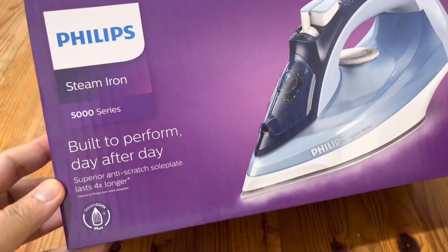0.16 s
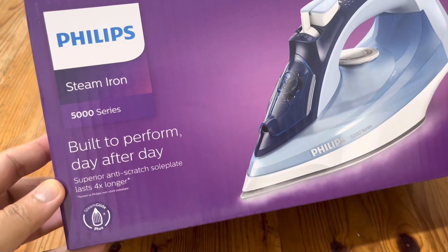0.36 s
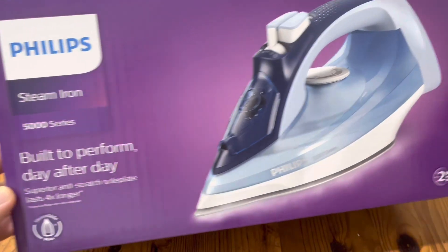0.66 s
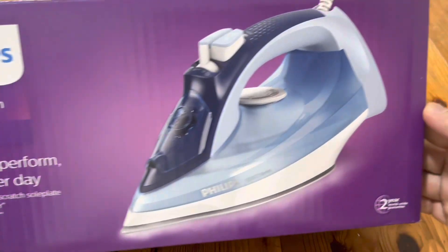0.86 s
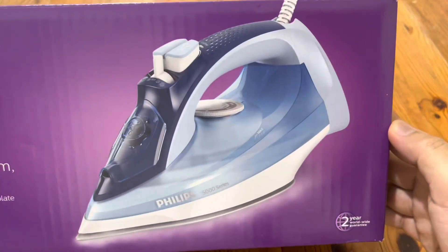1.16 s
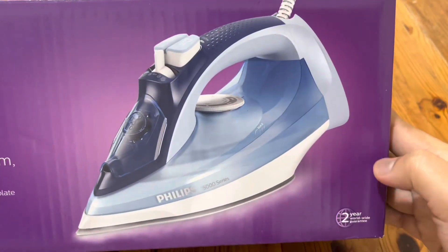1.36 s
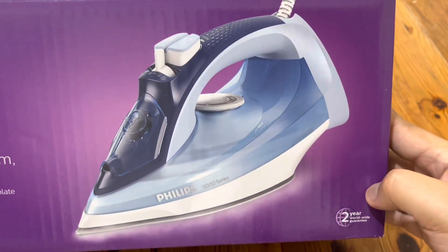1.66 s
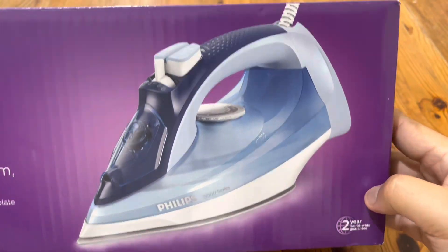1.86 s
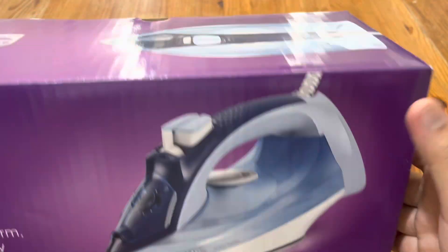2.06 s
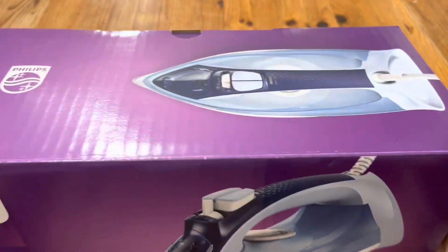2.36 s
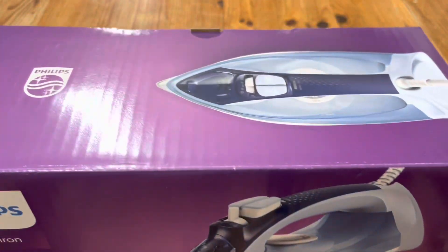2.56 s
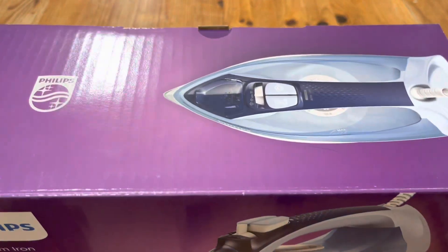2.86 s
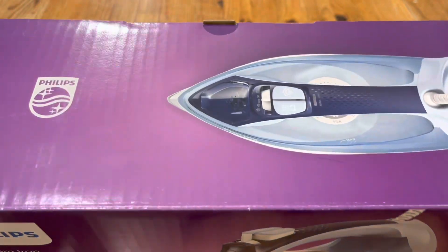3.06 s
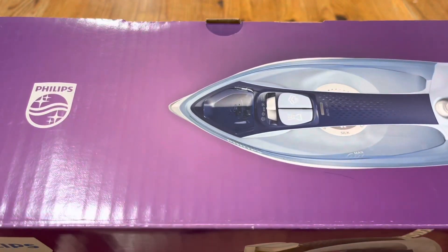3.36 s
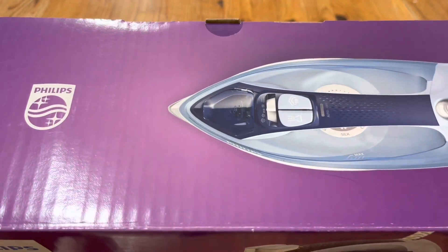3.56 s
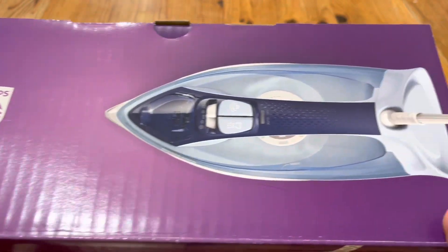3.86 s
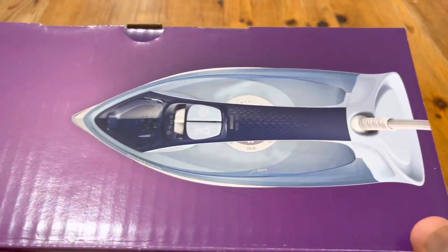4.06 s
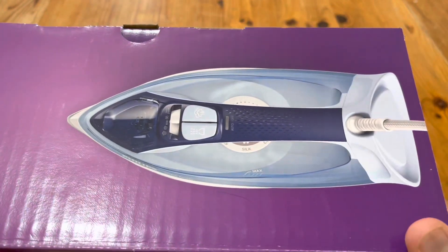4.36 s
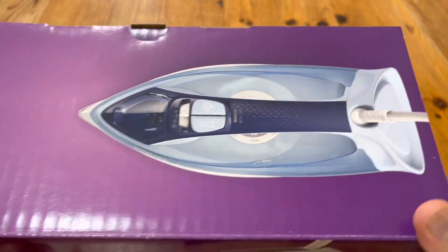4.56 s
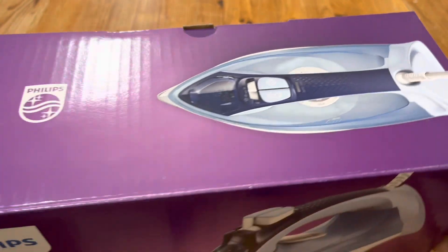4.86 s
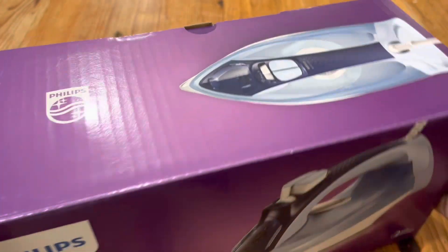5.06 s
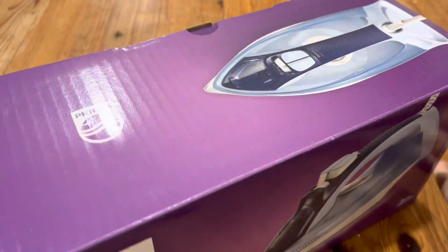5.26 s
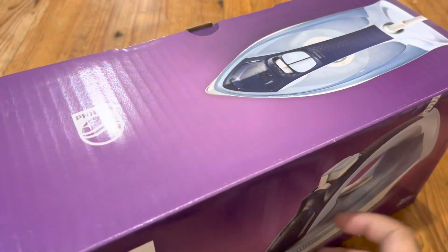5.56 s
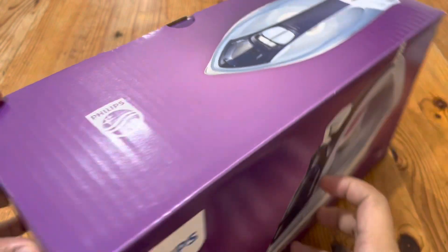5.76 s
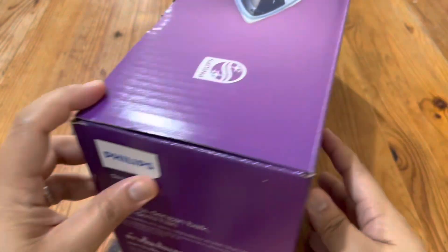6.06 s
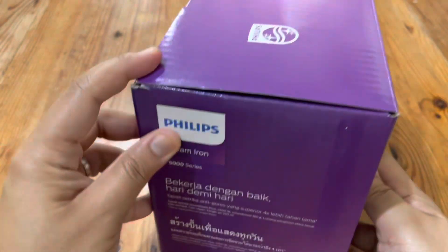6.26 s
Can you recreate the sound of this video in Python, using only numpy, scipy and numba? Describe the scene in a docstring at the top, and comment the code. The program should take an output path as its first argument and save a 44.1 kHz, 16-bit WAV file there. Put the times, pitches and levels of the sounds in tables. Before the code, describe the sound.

Hands shift and turn a cardboard box on a wooden table in five goes, with hollow taps, scrapes and drumming, busiest and loudest at the end.

```python
"""A distant whir and a wavering hum, made of coloured noise, run through a quiet room from start to end.
Just before half a second, hands begin to move a cardboard box on a wooden table, in five goes.
Noise grains make the hiss over the wood; repeated slips and random pushes make the box judder and drum.
Fingers and corners tap its panels, heard as short fading tones with clicks, over scratches of the grain.
The fourth go is busier, with a dense run of taps, and the fifth is loud and lasts to the end."""
import sys
import numpy as np
from scipy import signal
from scipy.fft import rfft, irfft
from scipy.io import wavfile
from scipy.ndimage import uniform_filter1d
from numba import njit

SR = 44100
rng = np.random.default_rng(int(sys.argv[2]) if len(sys.argv) > 2 else 0)


def to_wav(sig):
    """Store sig (one row per channel, or 1-D mono) as 16-bit WAV at the path in sys.argv[1].

    Samples outside -1..1 are clipped; the rate is SR.
    """
    pcm = np.clip(np.atleast_2d(sig), -1, 1) * 32767
    pcm = np.round(pcm).astype(np.int16)
    wavfile.write(sys.argv[1], SR, pcm.T)  # frames by channels


N = 282240  # samples, 6.4 s

# Colour of the room noise alike on both sides, then of the part that differs: f/Hz, density/dB per Hz
ROOM_SHARED_COLOUR = [(25, -29), (45, 5), (130, 0.5), (210, -8), (260, -11), (400, -35.5), (1000, -32),
                      (1350, -26), (1750, -24.5), (2100, -32.5), (2380, -54), (5000, -44), (8300, -69.5),
                      (11000, -55), (13000, -59), (15500, -80)]
ROOM_APART_COLOUR = [(25, -37), (60, 0.5), (120, 2), (200, -5), (400, -16.5), (1000, -22.5), (1400, -7.5),
                     (1650, -11.5), (2000, -19.5), (2600, -39.5), (6000, -37.5), (9500, -43), (11500, -57),
                     (15500, -67)]
# Hum before the lean of the room: f/Hz, width/Hz, level/dB
HUM_BANDS = [(52, 1.7, -76.5), (98.9, 1.1, -68.5), (186.8, 3.2, -64)]
# The whir comes from the left: f/Hz, left minus right/dB
ROOM_BALANCE = [(60, 1.5), (110, 3.5), (200, 0.0), (380, -1.5), (700, 1), (1290, 8), (2380, 14.5),
                (4400, 9.5), (8120, -1), (15000, 0.0)]
# Reflections that differ left and right: f/Hz, level against the direct sound/dB
REFLECTIONS = [(60, -14.5), (300, -18), (700, -6.5), (1500, -3.5), (2400, -12.5), (3500, -9.5),
               (6300, -1.5), (7600, -44), (9000, -48), (10000, -9), (11200, -17), (13200, -8.5),
               (14200, -8), (15500, -18)]
# Lead of the left side over the right: f/Hz, phase/rad
LEFT_LEAD = [(60, -0.01), (250, -0.18), (500, -0.046), (900, 1), (1900, -0.074), (2800, -1.19),
             (4800, -0.94), (6400, 0.7), (7750, -np.pi), (8900, -np.pi), (11100, -2 * np.pi),
             (13000, -2 * np.pi), (14600, -3 * np.pi)]
# Balance of the sounds near the box: f/Hz, left minus right/dB
NEAR_BALANCE = [(60, -1), (110, 0.5), (200, -1.5), (380, -1), (700, -1), (1290, 1), (2380, 2), (4400, 4),
                (8120, 0.5), (15000, -0.5)]
# Low shaking of the table legs: t/s, level/dB
LEG_SHAKES = [(0.0, -75), (0.09, -71), (0.82, -50.5), (1.07, -68), (1.98, -64), (2.03, -79), (2.17, -60),
              (2.55, -64), (2.6, -56), (4.78, -56), (4.85, -47.5), (5.56, -68), (5.6, -46), (6.4, -67)]
# A corner rasps along the grain: start t/s, end t/s, level/dB, pitch of the bands/times their table
RASP_STROKES = [(0.6, 0.76, -73, 0.57), (2.25, 2.33, -78, 2.2), (2.33, 2.558, -78, 1.24),
                (2.61, 2.74, -79, 1.25), (2.74, 2.927, -79, 0.99), (2.974, 3.165, -80, 1.1),
                (3.717, 4.05, -87, 1.36), (4.542, 4.646, -67, 1.04), (4.69, 4.874, -62.5, 0.985),
                (5.09, 5.197, -77, 1.1), (5.313, 5.373, -59, 1.2), (5.79, 6.025, -71, 2.2)]
# Bands of the rasp before pitch and wander: f/Hz, width/Hz, level/dB
RASP_TONES = [(1775, 77, -4.5), (2450, 170, -4), (2750, 190, 0), (3550, 220, -6), (4800, 140, -11),
              (6300, 240, -12)]
# Colour of the hiss: f/Hz, density/dB per Hz
HISS_COLOUR = [(500, 10.5), (1500, 1), (2300, -7), (2800, -7.5), (3650, -9.5), (4300, -11), (5500, -16),
               (6400, -18.5), (7200, -15), (10000, -16.5), (12800, -21), (13800, -22), (14600, -28),
               (15500, -46)]
# Five moves, one table each: t/s, hiss level/dB, mid-range rub level/dB, top level/dB,
# panel drumming level/dB, table boom level/dB
BOX_MOVES = [
    [(.43, -98, -76, -109, -72, -50), (.5, -84, -72, -104, -51, -53), (.57, -76, -70, -81, -59, -51),
     (.61, -73, -67, -81, -56.5, -42), (.7, -73.5, -63, -76.5, -55, -45), (.8, -75, -67.5, -82, -51.5, -40),
     (.87, -74.5, -72, -83, -56.5, -41.5), (.9, -76, -65.5, -84, -52, -49),
     (.93, -76, -68.5, -92, -58, -47.5), (.98, -80.5, -75, -87, -62, -47),
     (1.05, -81, -68.5, -87, -56.5, -60), (1.13, -84, -81, -99, -64, -60), (1.19, -90, -73, -109, -62, -56),
     (1.205, -76, -68, -77, -67, -58), (1.24, -83, -74, -89, -66, -65), (1.28, -93, -82, -105, -79, -59)],
    [(1.82, -90, -91, -104, -84, -69), (1.845, -75, -64, -80, -67, -62), (1.9, -77, -67, -77, -52, -64),
     (1.94, -82, -74, -94, -51.5, -63.5), (1.99, -77, -63, -74.5, -57.5, -55),
     (2.06, -69.5, -69, -70.5, -58.5, -63), (2.1, -70, -66, -72.5, -42.5, -56.5),
     (2.165, -66.5, -65, -80, -44, -46.5), (2.19, -69, -68, -76, -56, -56), (2.21, -68, -70, -78, -61, -57),
     (2.32, -67, -70, -84, -63, -49), (2.5, -70, -71.5, -80.5, -62.5, -64),
     (2.65, -74, -74, -82, -63.5, -57), (2.77, -70, -78, -80, -56.5, -63),
     (2.88, -78, -72.5, -82.5, -59, -49), (2.94, -79, -77, -88, -59, -52),
     (3.05, -76.5, -70, -76.5, -67, -59), (3.14, -75, -72, -81.5, -63.5, -62),
     (3.2, -91, -88, -109, -69, -63)],
    [(3.6, -86, -71, -100, -72, -64), (3.63, -83, -81, -86, -69, -68), (3.67, -80, -69, -76, -67.5, -65),
     (3.74, -74.5, -72.5, -79, -55, -69), (3.79, -75, -67, -78, -56, -49),
     (3.82, -74, -74, -77, -50, -51.5), (3.87, -76.5, -72.5, -76.5, -57.5, -57),
     (4.05, -78.5, -78, -79, -59, -53), (4.12, -84, -82, -89, -69, -55.5),
     (4.19, -92, -82, -109, -59.5, -56)],
    [(4.48, -97, -83, -106, -65, -72), (4.5, -66, -82, -99, -59, -59), (4.6, -69.5, -70.5, -73, -58, -51.5),
     (4.68, -68, -72, -72, -58, -62), (4.73, -61.5, -64, -69, -50.5, -47.5),
     (4.82, -64, -62.5, -71.5, -54, -56), (4.88, -60, -62, -68, -52.5, -59),
     (4.97, -64.5, -68, -70, -60.5, -53), (5.03, -64.5, -67, -72, -45, -48),
     (5.07, -62.5, -64, -70, -43.5, -46.5), (5.13, -61, -59.5, -69.5, -48.5, -48),
     (5.2, -64, -65, -67.5, -56, -52), (5.27, -62.5, -60, -73, -53, -43.5), (5.34, -66, -75, -64, -50, -61),
     (5.39, -73, -69, -85, -51, -47.5), (5.44, -75, -85, -82, -69, -54), (5.48, -87, -86, -100, -76, -51)],
    [(5.55, -82, -70, -100, -60, -56), (5.58, -82, -59, -95, -59, -43), (5.595, -56, -49, -73, -52, -51),
     (5.62, -62, -62, -74, -51, -45), (5.66, -71, -63.5, -75, -48, -45),
     (5.72, -56.5, -60, -69.5, -49.5, -42), (5.83, -57, -55.5, -64.5, -47, -50.5),
     (5.9, -56, -53.5, -61, -45, -47.5), (5.96, -59.5, -53.5, -68.5, -45.5, -45),
     (6.02, -56, -52.5, -63.5, -47.5, -42.5), (6.06, -61, -59, -73.5, -50, -47.5),
     (6.17, -61, -53, -65, -46, -49.5), (6.23, -59, -53, -68, -45.5, -44),
     (6.28, -66, -58, -70.5, -51, -43.5), (6.34, -65, -63, -77, -53, -50.5), (6.4, -64, -56, -73, -49, -47)],
]
# The same five levels/dB between the moves
REST_LEVELS = [-90, -82, -109, -74.5, -63.5]
# Box panels, before hits and grip reshape them: f/Hz, level/dB, t60/s
PANEL_MODES = [(89.5, -35, 0.17), (190, 1.5, 0.11), (257, 0, 0.085), (321.6, 3.5, 0.055), (388.2, 0, 0.071),
               (496, 0, 0.069), (583, -2.5, 0.02)]
# Stiff edges and flaps, before a hit reshapes them: f/Hz, level/dB, t60/s
EDGE_MODES = [(638, -1.5, 0.038), (785, 4, 0.027), (917, 5.5, 0.016), (1055, 1, 0.018), (1286, -1.5, 0.034),
              (1718, -0.5, 0.015), (2164, 0.5, 0.017), (2855, -11.5, 0.048)]
# Table top under the box: f/Hz, level/dB, t60/s
TABLE_MODES = [(94, -9.5, 0.15), (136, -5.5, 0.17), (200.3, 1.5, 0.1)]
# The box stutters on its edge: start t/s, length/s, slips per s, thud level/dB, thud pitch f/Hz,
# knock of the edges minus thud/dB
STUTTER_RUNS = [(.625, 0.039, 90, -37.5, 96.5, -33), (.683, .008, 100, -38.5, 190, -24),
                (0.711, .015, 103, -35, 100.4, -30), (.772, .008, 100, -36.5, 220.7, -22),
                (0.791, .02, 97, -29.5, 99, -35), (.823, .02, 97, -32, 97, -34),
                (.857, 0.018, 97, -38, 97, -33), (.92, .03, 70, -38, 111, -27),
                (1.854, 0.037, 124, -45, 403, -19), (2.083, .042, 110, -35.5, 322, -10.5),
                (2.134, 0.038, 110, -34.5, 296, -16), (5.056, .033, 97, -39, 325, -17),
                (5.337, .031, 165, -36, 328, -14), (6.17, 0.033, 199, -24.5, 388.4, -16),
                (6.205, 0.009, 200, -29.5, 385, -19), (6.221, .031, 197, -36, 335, -17)]
# Taps of fingers and corners: t/s, thud level/dB, thud pitch f/Hz, contact/cycles,
# table thump minus thud/dB, knock minus thud/dB, knock pitch f/Hz, click minus thud/dB,
# top of the click against its body/dB
TAP_HITS = [(.45, -56, 230, 2.4, -5, 3, 654, -27, -20), (.509, -47, 262, 2.8, -3, -2.5, 770, -26, -20),
            (.76, -44, 547, 2.8, -4, -5, 805, -13, -20), (.858, -50, 545, 2.4, -10, -10, 800, -30, -20),
            (.916, -50, 295, 2.8, -5, -5, 800, -27, -20), (1.01, -37, 376, 2.9, -20, -10, 1330, -28, -22),
            (1.13, -51, 506, 4.3, 2, -1, 1090, -27, -22), (1.204, -47.5, 490, 3.3, -1, -10, 770, -13, -3),
            (1.651, -51, 253, 1.75, 1, -4.5, 1030, -25, -20),
            (1.702, -49.5, 322, 2.9, 9, -21, 1410, -44, -20), (1.839, -35, 404, 3, -2.5, -6, 1390, -20, -4),
            (1.873, -36, 300, 2.4, -20, -1.5, 981, -10.5, -7),
            (1.889, -44, 380, 2.1, -15, -14, 706, -33, -20),
            (1.93, -33.5, 357, 2, -22, -12.5, 1300, -29, -20), (1.956, -51, 306, 2.1, -8, -13, 700, -8, -4),
            (2.058, -52, 400, 2.1, -12, 3, 848, -20, -20), (2.129, -44.5, 300, 2.4, -8, 7, 846, -17, -20),
            (2.284, -46, 347, 2.2, -9, -0.5, 689, -14, -14), (2.621, -50, 230, 2.6, 2, -4.5, 900, -22, -20),
            (2.684, -39, 295, 2.7, -12, -7, 740, -30, -20), (2.7, -44, 420, 2.4, -10, -7, 790, -30, -20),
            (2.789, -37.5, 328, 2.4, -17, -20, 732, -24, -20),
            (2.881, -46.5, 201, 2.7, 0, -16, 700, -30, -20),
            (2.927, -36, 362, 2.55, -2.5, -23, 1700, -39, -20),
            (2.954, -47, 312, 2.4, 4, 0, 1884, -2.5, -4.5), (3.662, -47.5, 530, 2.6, -14, -3, 660, -11, -8),
            (3.8, -37.5, 347, 2.9, -16, -4.5, 627, -27, -20),
            (4.153, -51.5, 298, 2.9, -7, -14, 1100, -15, -12),
            (4.492, -44, 240, 2.4, -14, -5, 1100, -2, -19), (4.6, -43, 260, 2.3, -6, -10, 1320, -5.5, -18),
            (4.652, -37, 542, 2.9, -23, -0.5, 756, -5, -11),
            (4.655, -30, 417, 4.3, -13, -22, 690, -40, -20), (4.844, -35, 447, 2.7, -8, -7, 776, -22, -20),
            (4.847, -30.5, 267, 2.4, -3, -19, 700, -35, -20),
            (4.865, -40, 383, 1.7, -12, -15, 650, -30, -20),
            (4.949, -25, 334, 2.66, -7.5, -13.5, 784, -17, -14),
            (5.042, -36, 506, 2.4, -17, -3, 796, -5, -6), (5.046, -32.5, 333, 3, -7, -20, 700, -30, -20),
            (5.055, -30, 392, 1.65, -16, -7.5, 1478, -10.5, -13),
            (5.092, -35.5, 232, 1.9, -2, -14, 762, -24, -20), (5.113, -37, 303, 2.5, -8, -8, 760, -30, -20),
            (5.168, -37.5, 458, 2.6, -10, -1, 783, -8, -19), (5.213, -41, 385, 4.9, -19, 1, 1586, -13, -20),
            (5.249, -35, 335, 2.9, -8, -7.5, 790, -11, -20),
            (5.273, -37.5, 348, 3.3, -10, -8, 790, -25, -20),
            (5.288, -41, 328, 3.3, -9, -10, 855, -25, -20), (5.338, -40.5, 395, 1.5, -15, 0, 740, 1.5, -13),
            (5.354, -39.5, 310, 2.7, -15, -1.5, 895, -2, -15), (5.423, -55, 230, 2.4, 5, -15, 1440, 1, -1),
            (5.501, -57, 231, 2.9, -3, -20, 1440, -8, -7), (5.564, -37.5, 385, 5.1, -2, -9, 780, -7.5, -12),
            (5.587, -36.5, 387, 1.9, -17, 2.5, 1080, -6, 2),
            (5.59, -23.5, 482, 2.7, -24, -8, 2260, -8, -16),
            (5.595, -20.5, 320.3, 3.7, -29, -11.5, 900, -42, -20),
            (5.624, -40.5, 220, 3, -7, -11, 800, -35, -20), (5.705, -43, 353, 2.7, -10, -2, 993, -11, -14),
            (5.731, -42, 240, 2.9, -10, -3, 727, -14, -18), (5.778, -41, 296, 2.2, -5, -6, 1300, -14, -18),
            (5.79, -38, 408, 2.4, -8, -4, 910, -16, -18), (5.837, -39, 347, 2.8, -10, -6, 795, -16, -18),
            (5.868, -48, 350, 2.2, -12, 0, 1400, -16, -18), (5.898, -35, 269, 2.2, -16, -4, 1290, -4, -18),
            (5.906, -34.5, 303, 2.2, -15, -3, 1290, -4, -5),
            (5.944, -29.5, 430, 2.96, -11, -17, 1010, -32, -20),
            (5.983, -23.5, 332, 2.8, -18, -8, 1100, -13, -7),
            (6.076, -24.5, 473, 4.3, -17, -5.5, 1086, -36, -20),
            (6.086, -27, 296, 1.94, -6, -11, 1060, -33, -20), (6.108, -37, 302, 2.2, 1, -8, 905, -25, -20),
            (6.139, -34, 244.5, 2.4, -6, -8, 790, -30, -20), (6.192, -35, 194, 2.9, 0, 1.5, 1310, -12, -18),
            (6.229, -35.5, 360, 2.4, -5, -1, 1190, -20, -20),
            (6.236, -30.5, 353, 2.7, -3, -5, 1305, -19, -11),
            (6.261, -39, 253, 2.7, -4, -6, 1320, -27, -20), (6.381, -44, 302, 2.4, -10, -4, 1220, -25, -20)]
# Where the taps land: t/s, left minus right/dB
TAP_PLACES = [(0, 1), (1.8, -1), (2.8, 1), (4.5, -0.5), (5.3, 1), (6, 2), (6.07, -2), (6.4, -4)]

ROOM_SHARED_DB, ROOM_APART_DB = -58, -67  # before the lean of the room
RASP_WANDER = .006  # typical share of the pitch
JUDDER_HZ = 101.04  # average slips per second
SLIP_SHARE, SLIP_PER_DB, SLIP_BOOM_DB = 0.29, -0.01, -55.5  # a heavier boom has fewer regular slips
# the harder the panels drum, the higher they ring
PANEL_HZ, PANEL_HZ_PER_DB, PANEL_KNEE_DB = 209, 4.5, -58.5
SAG, SAG_S = 0.22, 0.007  # a struck panel starts sharp by this share and slackens
TAP_RING_SHARE = 0.75  # share of the panels' ring time left in a tap
# the panels and edges nearest the hit in pitch ring most
THUD_NEAR_DB_PER_OCTAVE, THUD_SCATTER_DB = -22, 1.5
KNOCK_NEAR_DB_PER_OCTAVE, KNOCK_SCATTER_DB = -13.5, 3.4
KNOCK_RISE_S, THUMP_RISE_S = 0.00065, 0.0035
BLOW_S = .15  # time kept of each blow
TOP_HZ = 15665


def undb(db):
    """Turn a level in dB into a gain."""
    return 10 ** (np.asarray(db) / 20)


def level(x, db):
    """Set x to an average (rms) level in dB."""
    return x * undb(db) / np.sqrt(np.mean(x ** 2))


def curves(table):
    """Draw straight lines through a table's columns, one value per sample."""
    s, *columns = np.transpose(table)
    return [np.interp(np.arange(N) / SR, s, column) for column in columns]


def across(points):
    """Join (f/Hz, value) points by straight lines on a log frequency axis, one value per bin."""
    hz, value = np.transpose(points)
    return np.interp(np.log(np.fft.rfftfreq(N, 1 / SR) + 1), np.log(hz), value)


def colour(x, points):
    """Shape the spectrum of x by (f/Hz, dB) points."""
    return irfft(rfft(x) * undb(across(points)), N)


@njit
def svf(x, hz, width):
    """Let a band through, like a resonance whose centre can move; the gain at the centre is 1."""
    y, band_state, low_state = np.empty(len(x)), 0., 0.
    for i in range(len(x)):
        g, k = np.tan(np.pi * hz[i] / SR), width / hz[i]
        v = (band_state + g * (x[i] - low_state)) / (1 + g * (g + k))
        band_state = 2 * v - band_state
        low_state = low_state + 2 * g * v
        y[i] = k * v
    return y


def fixed_band(x, hz, width):
    """Let a band with a still centre through."""
    return svf(x, np.full(N, 1. * hz), 1. * width)


def band(x, lo_hz, hi_hz):
    """Keep what lies between two frequencies."""
    return signal.sosfilt(signal.butter(2, [lo_hz, hi_hz], "band", fs=SR, output="sos"), x)


def split(x, hz):
    """Cut x into parts under and over hz that add up to x."""
    low = signal.sosfiltfilt(signal.butter(2, hz, fs=SR, output="sos"), x)
    return low, x - low


def walk(rate):
    """Wander at random: new values rate times a second, smoothed twice; the spread is near 1."""
    k = int(SR / rate)
    steps = np.repeat(rng.standard_normal(N // k + 1), k)
    return 1.4 * uniform_filter1d(uniform_filter1d(steps, k), k)[:N]


def decay(t, t60):
    """Fade by 60 dB in t60 seconds."""
    return np.exp(-np.log(1000) * t / t60)


def ring(modes, gain_db, signs):
    """Add up the fading tones of a body after one blow; peak 1."""
    t = np.arange(int(BLOW_S * SR)) / SR
    hz, db, t60 = np.transpose(modes)[:, :, None]
    size = signs[:, None] * undb(db + gain_db[:, None])
    y = (size * decay(t, t60) * np.sin(2 * np.pi * hz * t)).sum(0)
    return y / np.abs(y).max()


def plain_ring(modes, alternate=True):
    """Ring a body by its table alone, with every second tone flipped if asked."""
    signs = (-1.) ** np.arange(len(modes)) if alternate else np.ones(len(modes))
    return ring(modes, np.zeros(len(modes)), signs)


def bend(modes, hz, ring_share):
    """Tune the mode nearest hz to it, and the rest alike; return them and their distance in octaves."""
    octaves = np.log2(np.array(modes)[:, 0] / hz)
    nearest = octaves[np.abs(octaves).argmin()]
    return np.array(modes) * [2 ** -nearest, 1, ring_share], np.abs(octaves)


def room():
    """Distant whir as coloured noise and a wavering hum as narrow noise bands, mostly alike on both sides."""
    whir = level(colour(rng.standard_normal(N), ROOM_SHARED_COLOUR), ROOM_SHARED_DB)
    shared = whir * undb(1.9 * walk(3.49))
    for hz, width, db in HUM_BANDS:
        shared = shared + level(fixed_band(rng.standard_normal(N), hz, width), db)
    apart = level(colour(rng.standard_normal(N), ROOM_APART_COLOUR), ROOM_APART_DB)
    lean = undb(across(ROOM_BALANCE) * np.array([[.5], [-.5]]))
    return irfft(rfft(np.array([shared + apart, shared - apart])) * lean, N)


def reflections_and_sides(near):
    """Table and walls add fading echoes, partly unlike left and right. Apart from the echoes, left and right
    also differ in balance and timing by pitch."""
    t = np.arange(int(.4 * SR)) / SR
    echoes = rng.standard_normal((2, len(t))) * decay(t, np.array([[.22], [.25]]))
    shared, apart = echoes / np.sqrt(np.sum(echoes ** 2, axis=1, keepdims=True))
    mono = near.mean(0)
    tail = undb(-13.5) * signal.fftconvolve(band(mono, 220, 3200), shared)[:N]
    side = colour(signal.fftconvolve(mono, apart)[:N], REFLECTIONS)
    sign = np.array([[1], [-1]])  # left, right
    both = near + tail + side * sign
    balance = undb(across(NEAR_BALANCE) * sign / 2)
    lead = np.exp(.5j * across(LEFT_LEAD) * sign)
    return irfft(rfft(both) * balance * lead, N)


def leg_shakes():
    """The table legs shake low down: noise through two bands around 54 Hz."""
    shake = fixed_band(fixed_band(rng.standard_normal(N), 54, 22), 54, 30)
    return undb(curves(LEG_SHAKES)[0]) * level(shake, -1.5)


def rasps():
    """A corner scratches the grain: flickering noise that sings in a few narrow, wandering bands."""
    t = np.arange(N) / SR
    noise = rng.standard_normal(N) * undb(2.5 * walk(80))
    start, _, _, pitch = np.transpose(RASP_STROKES)
    latest = np.clip(np.searchsorted(start, t) - 1, 0, None)
    pitch = pitch[latest] * (1 + RASP_WANDER * walk(17))
    tones = sum(level(svf(noise, hz * pitch, 1. * width), db) for hz, width, db in RASP_TONES)
    strokes = sum(undb(db) * np.interp(t, [a, a + 0.044, b - .03, b], [0, 1, 1, 0])
                  for a, b, db, _ in RASP_STROKES)
    return tones * strokes


def patchy(x, depth_db, rate):
    """Each narrow band swells and fades alone, at random."""
    # bands overlap, each 1.13 times the pitch of the one below, from 500 Hz up
    place = np.log(np.fft.rfftfreq(N, 1 / SR) / 500 + 1e-9) / np.log(1.13)
    place, spectrum, out = np.clip(place, 0, 28), rfft(x), np.zeros(N)
    for k in range(29):
        share = np.clip(1 - np.abs(place - k), 0, 1)
        out += irfft(spectrum * share, N) * undb(depth_db * walk(rate))
    return out


def slide(hiss_db, mid_db, top_db):
    """Tiny slips of card on wood: dense noise grains, a few larger, that also rattle the edges."""
    grain_db = rng.exponential(size=N) + 0.86 * walk(90) + 0.81 * walk(25.01)
    grains = rng.standard_normal(N) * undb(grain_db)
    low, rest = split(patchy(colour(grains, HISS_COLOUR), 1.95, 12), 2130)
    high, top = split(rest, 8300)
    # sparse catches of the fibres ring the edges
    catches = rng.standard_normal(N) * undb(3.7 * np.minimum(rng.exponential(size=N), 6))
    rattle = signal.fftconvolve(catches, plain_ring(EDGE_MODES))[:N]
    mid = level(rattle, -8) + level(split(low, 380)[1], 0.68)
    crackle = band(catches * undb(2.8 * walk(30)), 1900, 5000)
    hiss = level(high, -0.48) + level(crackle, -13.5)
    return undb(mid_db) * mid + undb(hiss_db) * hiss + undb(top_db) * level(top, 2.3)


def drag(panel_db, boom_db):
    """The box grips and lets go about 100 times a second, mixed with random pushes; panels and table ring."""
    panel_hz = PANEL_HZ + PANEL_HZ_PER_DB * np.clip(panel_db - PANEL_KNEE_DB, 0, 30)
    share = np.clip(SLIP_SHARE + SLIP_PER_DB * (boom_db - SLIP_BOOM_DB), 0, 1)
    phase = np.cumsum(JUDDER_HZ * (1 + 0.12 * walk(40)) / SR)
    # one slip each time the phase passes a whole number
    slips = level(np.diff(np.floor(phase), prepend=0) * undb(1.6 * walk(70)), 0)
    rumble = rng.standard_normal(N) * undb(3.34 * walk(45))
    push = share * slips + (1 - share) * rumble
    # the hands damp all but the panels near the free pitch
    drumming = signal.fftconvolve(push, plain_ring(PANEL_MODES))[:N]
    panels = level(svf(drumming, panel_hz, 200.0), 0)
    boom = level(fixed_band(fixed_band(push, 95, 66), 90, 90), -2.1)
    return undb(panel_db) * panels + undb(boom_db) * boom


def moves():
    """Give the five levels of the moves, one value per sample; between moves they rest."""
    t = np.arange(N) / SR
    out = np.repeat(np.array(REST_LEVELS, float)[:, None], N, 1)
    for table in BOX_MOVES:
        inside = (t >= table[0][0]) & (t <= table[-1][0])
        out = np.where(inside, curves(table), out)
    return uniform_filter1d(out, size=300)


def thud(hz, draw, ring_share, cycles, sag):
    """A soft contact rings the nearest panels; the grip bends their pitch and shortens the ring; peak 1."""
    hz = hz / (1 + sag / 2)  # the pitch heard lies midway along the sag
    t = np.arange(int(max(cycles, 1) * SR / hz)) / SR
    push = np.hanning(len(t)) * (np.sin(2 * np.pi * hz * t) + 0.44)
    held, octaves = bend(PANEL_MODES, hz, max(ring_share, .2))
    gain_db = THUD_NEAR_DB_PER_OCTAVE * octaves + THUD_SCATTER_DB * draw
    y = np.convolve(ring(held, gain_db, np.ones(len(PANEL_MODES))), push)
    # play the start faster, so the pitch slackens
    t = np.arange(int(BLOW_S * SR)) / SR
    y = np.interp(t + sag * SAG_S * (1 - np.exp(-t / SAG_S)), np.arange(len(y)) / SR, y)
    return y / np.abs(y).max()


def stutters():
    """The edge slips in uneven runs that swell in, each slip a thud with a faint knock of the edges."""
    out = np.zeros(N + SR)
    edge_db = -9 * np.log2(np.array(EDGE_MODES)[:, 0] / 675)
    knock = ring(EDGE_MODES, edge_db, (-1.) ** np.arange(len(EDGE_MODES)))
    panels = len(PANEL_MODES)
    chance = rng.standard_normal((len(STUTTER_RUNS), panels + 40))
    for (s, length, rate, db, hz, knock_db), draw in zip(STUTTER_RUNS, chance):
        panel_draw, late, size = np.split(draw, [panels, panels + 20])
        when = np.arange(20) / rate + 0.00022 * late
        swell = np.minimum(0.54 + when / 0.02, 1)
        ending = np.clip((length - when) * rate, 0, 1)
        slips = np.zeros(SR // 2)
        slips[(np.abs(when) * SR).astype(int)] = undb(2.0 * size) * ending * swell
        blow = thud(hz, panel_draw, 0.99, 2.4, 0) + undb(knock_db) * knock
        run = signal.fftconvolve(slips, blow)
        i = int(s * SR)
        out[i:i + len(run)] += undb(db) * run / np.abs(run).max()
    return out[:N]


def crack(x, top_db):
    """A click: low treble, and a top that is strong where a nail or a hard corner strikes; peak 1."""
    y = band(x, 1320, 5900) + undb(top_db) * band(x, 4500, 12500)
    return y / np.abs(y).max()


def taps():
    """Each blow is a click, a short knock of the edges, a thud of the panels and a thump of the table."""
    out, t = np.zeros((2, N + SR)), np.arange(int(BLOW_S * SR)) / SR
    panels, edges = len(PANEL_MODES), len(EDGE_MODES)
    chance = rng.standard_normal((len(TAP_HITS), panels + edges + len(t)))
    thump = plain_ring(TABLE_MODES, alternate=False) * (1 - np.exp(-t / THUMP_RISE_S))
    click_fade = np.exp(-t / 0.0022) + 0.16 * np.exp(-t / 0.017)
    for hit, draw in zip(TAP_HITS, chance):
        s, db, hz, cycles, thump_db, knock_db, knock_hz, click_db, top_db = hit
        panel_draw, edge_draw, noise = np.split(draw, [panels, panels + edges])
        bent, octaves = bend(EDGE_MODES, knock_hz, 1)
        edge_db = KNOCK_SCATTER_DB * edge_draw + KNOCK_NEAR_DB_PER_OCTAVE * octaves
        knock = ring(bent, edge_db, np.sign(edge_draw)) * (1 - np.exp(-t / KNOCK_RISE_S))
        click = crack(noise * click_fade, top_db)
        body = thud(hz, panel_draw, TAP_RING_SHARE, cycles, SAG)
        body = body + undb(thump_db) * thump + undb(knock_db) * knock
        pan_db = np.interp(s, *np.transpose(TAP_PLACES))
        sides = undb(np.array([[pan_db], [-pan_db]]) / 2)
        i = int(s * SR)
        out[:, i:i + len(t)] += undb(db) * (sides * body + undb(click_db) * click)
    return out[:, :N]


def scene():
    """Put the box up close, in the quiet room."""
    hiss_db, mid_db, top_db, panel_db, boom_db = moves()
    rubbing = slide(hiss_db, mid_db, top_db) + rasps()
    drumming = drag(panel_db, boom_db) + leg_shakes()
    near = rubbing + drumming + taps() + stutters()
    return reflections_and_sides(near) + room()


def record(dry):
    """Cut the deepest bass and, steeply, the very top."""
    dry = signal.sosfilt(signal.butter(4, 38, "high", fs=SR, output="sos"), dry)
    return signal.sosfilt(signal.ellip(10, .2, 80, TOP_HZ, fs=SR, output="sos"), dry)


dry = scene()
out = record(dry)
to_wav(out)
```